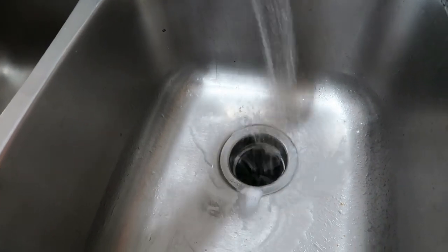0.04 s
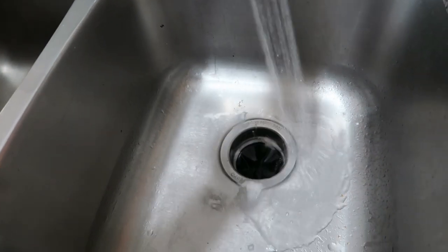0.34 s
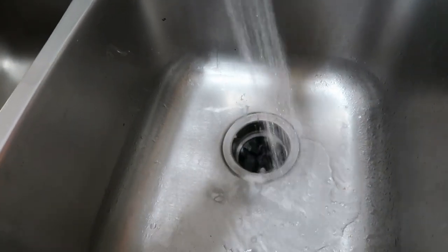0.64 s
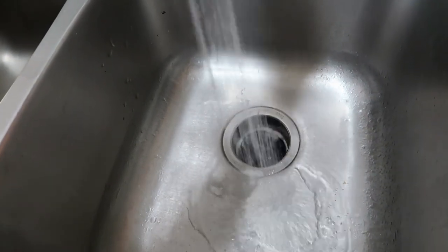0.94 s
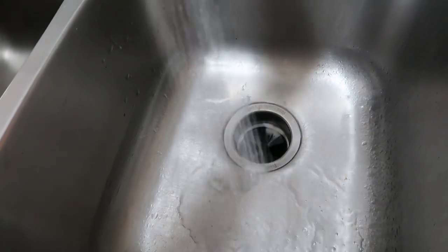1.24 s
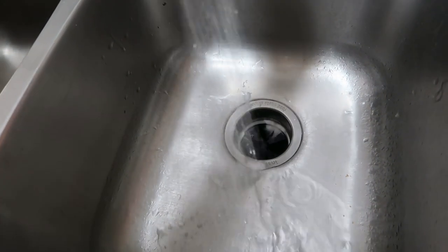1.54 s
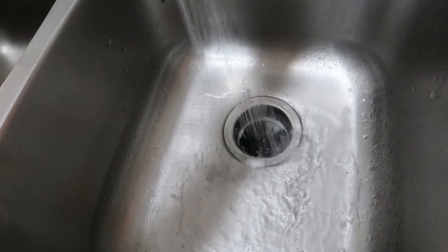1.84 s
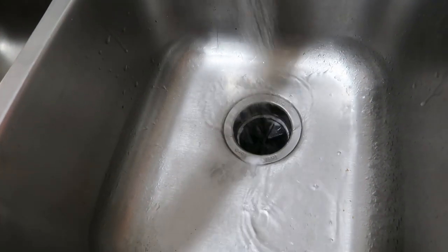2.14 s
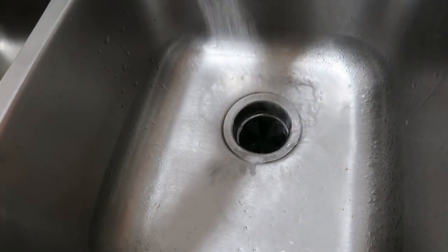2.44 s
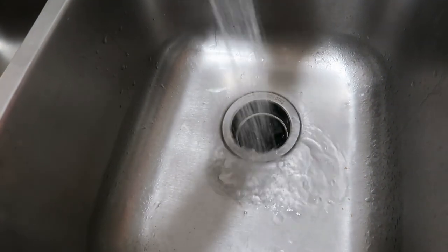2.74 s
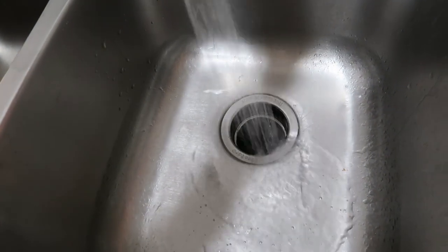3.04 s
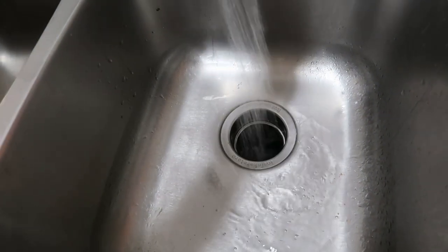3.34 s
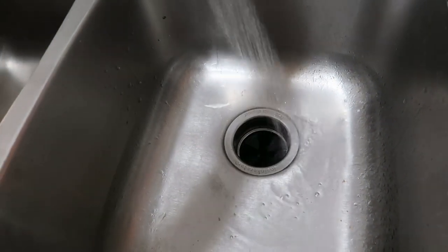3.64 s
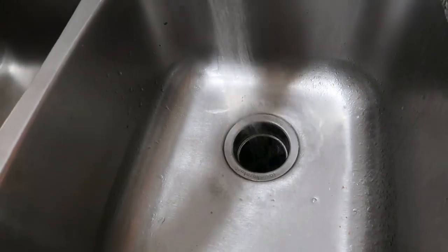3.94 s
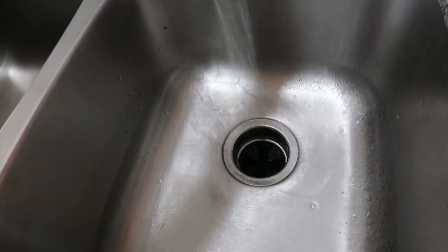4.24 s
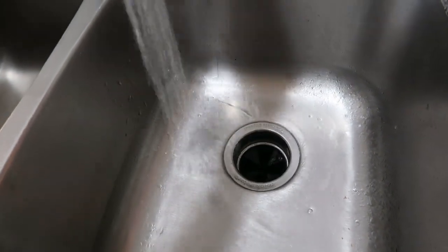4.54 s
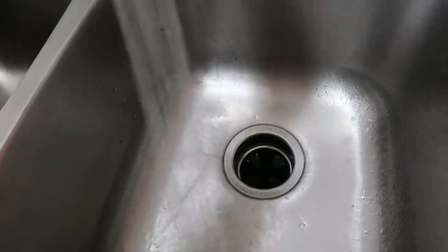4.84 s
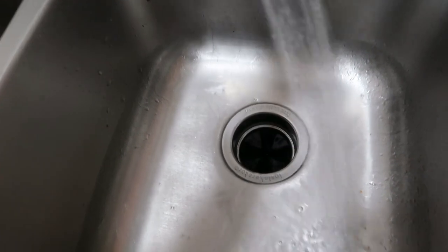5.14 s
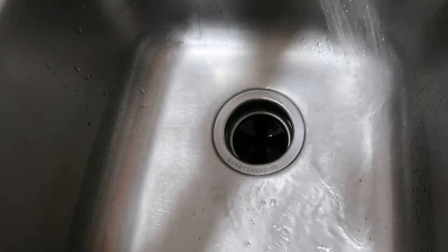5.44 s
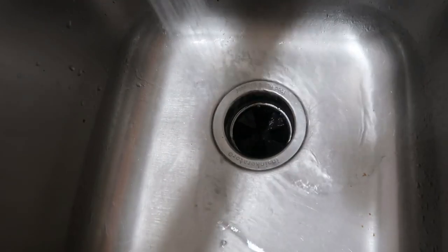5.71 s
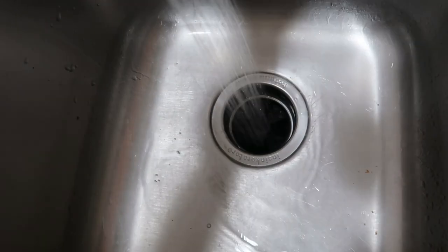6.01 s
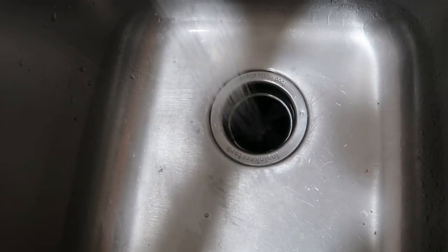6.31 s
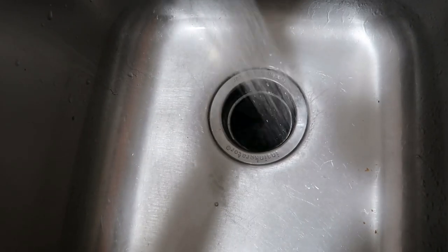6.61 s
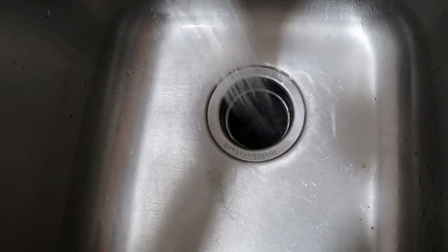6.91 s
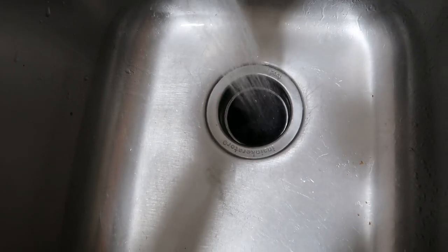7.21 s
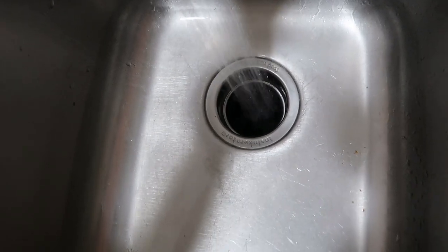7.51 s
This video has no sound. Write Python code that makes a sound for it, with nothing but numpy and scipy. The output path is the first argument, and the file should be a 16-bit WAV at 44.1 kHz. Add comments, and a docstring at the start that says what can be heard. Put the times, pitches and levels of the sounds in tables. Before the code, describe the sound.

Close over a metal kitchen sink, a running garbage disposal sloshes and rattles while spraying water drums on the basin. Small scraps knock and tick inside the grinder. As the chamber drains, the churning eases and a low, pulsing motor drone grows louder, with a few drips and last knocks. Finally the spray goes down the drain, which resonates hollowly over the softening hum.

```python
"""A garbage disposal under a rinsed steel sink.

A spray head patters and drums on the basin while the spinning plate below thrashes the water, exciting
the resonances of the chamber. Scraps knock on the grind ring and fine grit ticks round it. As the
chamber drains, the motor's hum comes through, throbbing where a shaft harmonic beats with the mains
hum. At the end the jet is aimed down the drain and booms in the open chamber."""
import sys
import numpy as np
from scipy import signal
from scipy.fft import rfft, irfft, next_fast_len
from scipy.io import wavfile
from scipy.ndimage import uniform_filter1d, map_coordinates

SR = 44100
rng = np.random.default_rng(int(sys.argv[2]) if len(sys.argv) > 2 else 0)


def dump_mix(stems):
    """Bounce the given channels to the path in sys.argv[1] as a 16-bit WAV at rate SR."""
    frames = np.atleast_2d(stems).T  # one column per channel
    limited = np.clip(frames, -1, 1)  # hard clip at full scale
    pcm = np.round(limited * 32767).astype(np.int16)
    wavfile.write(sys.argv[1], SR, pcm)


N = 342657

# Modes of the basin floor. Each row: frequency in Hz, width in Hz, gain in dB.
FLOOR_MODES = [(53.3, 13, -2), (99, 33, -1.5), (145.7, 38, 0), (500, 87, -7.5), (690, 160, -10.5),
               (985, 200, -8.5)]
# The steel's bright modes, the grind ring with its housing, and the open chamber. Rows as above.
CLICK_MODES = [(2520, 480, 0), (4343, 277, 7), (5360, 200, 6.5), (5735, 630, 0.5), (7040, 1060, -3)]
RING_MODES = [(774, 17, -6), (898.4, 50, 0), (1006, 159, 3.5), (1104, 63, -4), (1228, 20, -18),
              (1510, 160, -4.5)]
HOLLOW_MODES = [(188, 63, -37), (230, 42, 7), (265, 120, -5)]
# Upper modes of the chamber in each of its four states. Rows as above.
FLOODED_MODES = [(2120, 290, 4.5), (2280, 330, 3.5), (2660, 206, 8.5), (2950, 164, 4.5), (3430, 730, -25),
                 (3900, 390, 1), (4120, 114, 8), (4460, 300, 4.5), (5570, 700, -2), (6620, 980, -7.5)]
DRAINING_MODES = [(1980, 110, -3), (2317, 160, 1.5), (2773, 310, 0), (2930, 70, 4.5), (3160, 190, -2.5),
                  (4206, 280, 3), (5080, 250, 0.5), (5346, 220, 1.5), (5540, 270, -0.5), (6480, 280, -2),
                  (6880, 490, -2), (8340, 180, -17.5)]
EMPTY_MODES = [(2150, 700, -4), (2485, 280, 1.5), (2800, 190, -3), (3055, 170, 0), (3400, 250, -3),
               (4430, 190, 1), (4710, 180, 1), (5340, 99, 4), (5650, 380, -1.5), (6870, 430, -10)]
JET_FED_MODES = [(2230, 530, -9.5), (2460, 190, -4), (2914, 260, -2.5), (3060, 76, 5), (3340, 190, -4.5),
                 (4260, 100, -7), (4640, 87, -3), (4830, 110, -4), (5164, 260, -3), (5940, 190, 0),
                 (6460, 240, -2.5), (6780, 490, -8), (7300, 460, -13.5), (8390, 160, -4.5),
                 (8670, 180, -16)]
# The grind ring under a hard blow. Each row: frequency in Hz, relative level in dB, T60 in seconds.
STRUCK_MODES = [(519, -21, 0.076), (740, -15, 0.012), (913, -13, 0.06), (1008, -4, 0.037),
                (1101, -18, 0.051), (1600, -11, 0.017)]

# Spectra of spray, churning water and wash under the jet. Each row: frequency in Hz, gain in dB.
SPRAY_SPECTRUM = [(100, -32), (400, 9), (1000, 0), (2000, -0.5), (3300, 0.5), (3700, -2.5), (4000, -4),
                  (4400, 3.5), (5000, -1), (7500, 4), (9500, 3.5), (11500, 6.5), (13000, 5), (14200, -1),
                  (15500, -23)]
CHURN_SPECTRUM = [(21, -62), (35, -48), (53, -14), (97, -18.5), (177, -4), (228, 2.5), (277, -2), (308, 3),
                  (374, -9.5), (410, -5.5), (474, -9.5), (526, -2), (577, -9), (711, -16.5), (800, -20.5),
                  (1040, -15), (1760, -120)]
WASH_SPECTRUM = [(30, -42), (60, -31), (115, 1.5), (160, -6.5), (240, 4), (340, -1.5), (390, -6), (480, -7),
                 (555, -23), (620, -5), (800, -15.5), (1100, -33)]
# Stereo width of the spray and the wall reflections. Each row: frequency in Hz, side gain in dB.
SPRAY_WIDTH = [(100, -17), (500, -14), (2000, -33), (5000, -15), (8000, -2), (11000, -4), (15000, 0)]
WALL_WIDTH = [(40, -60), (100, -54), (190, -52), (350, -27), (700, -35.5), (1100, -36), (2400, -19.5),
              (6000, -7)]
# Phase between the channels. Each row: frequency in Hz, lead of the left in radians.
LEFT_LEAD = [(2500, 0), (6500, -.22), (8300, -.55), (9800, -1.2), (12000, -1.85), (15000, -2.8)]

# Envelopes of the spray, the grit, the ring's rattle, the water thrown by the plate, and the motor's
# vibration, muffled while water covers the plate. Each row: time in seconds, relative level in dB.
SPRAY_LEVEL = [(0.0, -36.5), (0.43, -37), (0.45, -41), (0.67, -46.5), (0.73, -41), (1.82, -39.5),
               (1.99, -43.5), (2.16, -38), (3.72, -32.5), (4.07, -35.5), (5.47, -37.5), (5.86, -33),
               (6.75, -35), (6.82, -38), (7.77, -37.5)]
GRIT_LEVEL = [(0, -55), (.38, -55), (.45, -37), (1.5, -35.5), (3.1, -33), (3.5, -25), (3.9, -30),
              (4.15, -35.5), (4.7, -38), (5.2, -41.5), (7.77, -42)]
RATTLE_LEVEL = [(0, -50), (.37, -50), (.41, -16), (.55, -23.5), (.7, -23.5), (1.45, -25), (1.8, -23.5),
                (2.4, -20.5), (2.8, -27), (3.2, -23.5), (3.9, -28), (4.1, -31.5), (4.8, -32.5),
                (5.05, -24.5), (6.5, -27), (6.85, -32.5), (7.77, -27)]
WATER_LOAD = [(0, -23), (.36, -20.5), (.405, 0), (.59, 2), (.65, -0.5), (.74, 1), (1.05, 1), (1.32, -0.5),
              (1.44, -4.5), (1.57, -2.5), (1.7, -1.5), (1.8, -1), (1.86, -4.5), (2.03, -4), (2.25, 0),
              (2.45, -2), (2.78, 0.5), (3.45, -2), (3.7, -8.5), (4.2, -13.5), (5.7, -10), (5.95, -7),
              (6.7, -1.5), (6.87, -7), (7.4, -3.5), (7.77, -3)]
VIBRATION_LEVEL = [(0, -42), (.36, -40), (.42, -17), (3.4, -16), (3.65, -12.5), (4.3, -9.5), (4.7, -6.5),
                   (4.95, -1.5), (5.22, 2), (5.55, 1), (5.9, 1), (6.9, -7), (7.77, -9)]

# Large drops and bubbles. Each row: start in seconds, level in dB, frequency in Hz.
LARGE_DROPS = [(0.042, -19, 5570), (0.065, -19, 11800), (0.087, -24, 4050), (0.177, -28, 7950),
               (0.224, -23, 2995), (0.256, -22.5, 4640), (5.406, -17, 1440), (5.787, -22, 2290),
               (5.822, -12, 10300), (5.86, -21, 2340), (5.918, -15.5, 3230), (5.921, -19, 4400),
               (5.994, -13, 8500)]
# Short low thumps of water; from 6 s, swells of the hollow boom in the drain.
# Each row: start in seconds, relative level in dB, frequency in Hz.
LOW_THUMPS = [(0.158, -24, 237), (0.179, -19, 254), (0.305, -20, 262), (0.328, -17.5, 254),
              (0.411, -22.5, 79), (2.32, -22.5, 127), (3.49, -23, 140), (5.051, -19, 159),
              (5.303, -14, 141), (5.852, -12, 136), (6.064, -3, 225), (6.76, -3.5, 219), (6.866, -8, 222),
              (7.159, -6.5, 220), (7.49, -8, 224)]
# Narrow resonances that swell and fade: gurgles, ringing and a low motor roar.
# Each row: start and end in seconds, first and last pitch in Hz, width in Hz, level in dB.
PASSING_RESONANCES = [(0.261, 0.363, 960, 1020, 220, -38), (0.29, 0.382, 527, 520, 70, -37),
                      (0.405, 0.49, 540, 550, 112, -20), (0.429, 0.633, 1020, 1190, 120, -18.5),
                      (1.198, 1.44, 2090, 2140, 180, -35), (1.199, 1.38, 1470, 1480, 90, -36),
                      (1.778, 2.02, 900, 983, 80, -25.5), (2.166, 2.297, 1540, 1610, 110, -28),
                      (2.602, 2.916, 2220, 2320, 180, -28.5), (2.881, 3.836, 2960, 2940, 118, -35),
                      (3.422, 3.55, 527, 533, 70, -24.5), (3.74, 3.93, 1030, 1000, 130, -25.5),
                      (3.85, 4.058, 2400, 2340, 220, -36), (4.68, 5.087, 505, 533, 60, -32),
                      (5.949, 6.85, 720, 760, 201, -31.5), (5.717, 5.93, 2390, 2330, 160, -38.5),
                      (6.497, 7.999, 3040, 3115, 120, -38)]
# Scraps hitting the ring. Each row: start in seconds, relative levels of ring and of click in dB.
SCRAP_HITS = [(0.399, -8, -36), (0.41, -13, -19), (0.433, 4.5, -33), (0.49, -6, -31), (0.521, -3, -28),
              (0.536, -12, -22), (0.88, -7, -24.5), (0.925, 0, -38), (0.978, -15, -22.5), (1.117, 1, -33),
              (1.21, -1, -26), (1.327, -7, -23), (1.389, -19, -25), (1.569, 3, -23), (1.789, 2.5, -23),
              (1.811, -1, -22), (1.892, -3, -24), (1.927, 0, -23), (2.116, -4, -20), (2.211, -2, -27),
              (2.881, -11, -21), (2.987, -2, -26), (3.078, -1, -26), (3.185, 1, -21), (3.243, -12, -19),
              (3.482, -7, -22), (3.597, -20, -21), (3.702, -14, -25), (3.822, -16, -31), (3.86, -12, -33),
              (3.891, 0.5, -33), (3.922, -6, -22.5), (3.992, -23, -22), (4.061, 2.5, -23.5),
              (4.068, -5, -40), (4.127, -14, -20.5), (4.19, -28, -29), (4.333, -31, -29), (4.552, -20, -23),
              (4.565, 1, -25), (4.585, -14, -36), (4.635, -12, -24), (4.669, -19, -28), (4.774, -26, -30),
              (5.316, -3, -33), (5.376, 0, -22), (5.454, -3, -28), (6.03, -6, -28)]

# The chamber. Each row: time in seconds, state (0 flooded, 1 draining, 2 nearly empty, 3 jet falling in).
CHAMBER_STATE = [(0, 2), (.36, 2), (.4, 0), (1.6, 0), (2.7, 1), (3.6, 1), (4.5, 1.5), (4.9, 2), (5.7, 2),
                 (6.12, 3)]
# Its air resonance, rising as it drains. Each row: time in seconds, frequency in Hz.
THROAT_PITCH = [(0, 1480), (.8, 1417), (3.2, 1616), (4.7, 1626), (5.1, 1805), (5.7, 1840), (6, 1720)]
# One entry per state: relative levels of slosh and throat, and depth of the splatter's gurgle, in dB.
SLOSH_LEVELS = [-26, -27.5, -29.5, -25]
THROAT_LEVELS = [-24, -23, -24.5, -28.5]
GURGLE_DEPTHS = [2.3, 1.5, 2.0, 2.0]
# Water cushions a blow and draws out its scrape. One entry per state: rise time and T60 in seconds.
KNOCK_RISES = [.004, .003, .0016, .0016]
SCRAPE_DECAYS = [.05, .04, .025, .025]

# Rotation of the shaft. Each row: time in seconds, turns per second.
SHAFT_SPEED = [(0, 29.8), (.4, 29.7), (.6, 29.1), (3.4, 29.3), (4.2, 29.56), (5.7, 29.56), (6.1, 29.52),
               (7.77, 29.48)]
# Its harmonics. Each row: multiple of the shaft speed, relative level in dB.
SHAFT_ORDERS = [(2, -20), (3, -16), (4, -10), (5, -8), (7, -7.5), (8, 2.5), (9, 6.5), (10, -6), (11, -24),
                (12, -8), (13, -15.5), (14, -13.5), (16, -14), (17, -24), (18, -8), (19, -24), (21, -13.5),
                (23, -34), (27, -20), (28, -16), (29, -16), (30, -3), (31, -5), (33, -26), (34, -20),
                (35, -10), (36, -17), (37, -8), (38, -15), (62, -11.5)]
# Magnetic hum. Each row: frequency in Hz, relative level in dB.
MAINS_HUM = [(120, -3.5), (240, -1.5), (360, -25)]

TOP_HZ = 15600  # upper band limit


def amp(db):
    """Amplitude ratio of a level in decibels."""
    return 10 ** (np.asarray(db) / 20)


def unit(x):
    """The signal normalised to an rms of 1."""
    return x / np.sqrt(np.mean(x ** 2) + 1e-20)


def along(points, hz):
    """Interpolation of (Hz, value) points on a logarithmic frequency axis."""
    f, v = np.transpose(points)
    return np.interp(np.log(hz + 1), np.log(f + 1), v)


def curve(points):
    """Linear interpolation of (seconds, value) points, one value per sample."""
    return np.interp(np.arange(N) / SR, *np.transpose(points))


def by_state(state, values):
    """Linear interpolation between the values for the four states of the chamber."""
    return np.interp(state, np.arange(4), values)


def wobble(rate):
    """Smooth random modulation with `rate` knots a second."""
    return map_coordinates(rng.standard_normal(int(N * rate / SR) + 4), [np.arange(N) * rate / SR])


def angle(hz):
    """Phase as the time integral of frequency."""
    return 2 * np.pi * np.cumsum(hz) / SR


def widen(mid, side):
    """Left and right as the sum and difference of mid and side."""
    return np.array([mid + side, mid - side])


def filtered(x, response):
    """Linear filtering: the spectrum is multiplied by a frequency response."""
    size = next_fast_len(N + SR // 4, True)
    return irfft(rfft(x, size) * response(np.fft.rfftfreq(size, 1 / SR)), size)[..., :N]


def body(x, modes, low_hz, high_hz):
    """Modal superposition: x drives steep-sided resonances, confined to a band."""
    f = np.arange(SR // 2 + 1.)
    gain = sum(amp(db) * (1j * f * width / (centre ** 2 - f ** 2 + 1j * f * width)) ** 2
               for centre, width, db in modes)
    rung = filtered(x, lambda hz: np.interp(hz, f, gain))
    return signal.sosfilt(signal.butter(3, [low_hz, high_hz], "band", fs=SR, output="sos"), rung)


def resonate(blows, hz, width_hz):
    """Forced resonance in a narrow band whose centre frequency moves."""
    carrier = np.exp(1j * angle(hz))
    lowpass = signal.butter(2, width_hz / 2, fs=SR, output="sos")
    return unit((carrier * signal.sosfilt(lowpass, blows / carrier)).real)


def impacts(rate, spread_db):
    """Shot noise: tiny independent blows of uneven size, `rate` a second."""
    blows = (rng.random(N) < rate / SR) * rng.standard_normal(N)
    return unit(blows * amp(spread_db * np.clip(rng.standard_normal(N), -2, 2)))


def gurgle(x, depth_db):
    """Spectral modulation: narrow bands swell and fade within hundredths of a second."""
    _, t, spectrum = signal.stft(x, SR, nperseg=512)
    field = rng.standard_normal(spectrum.shape)
    for _ in range(2):
        field = uniform_filter1d(uniform_filter1d(field, size=3, axis=0), size=5, axis=1)
    depth = np.interp(t, np.arange(N) / SR, depth_db * np.ones(N))
    gain = amp(depth * np.clip(unit(field), -2, 2))
    gain /= np.sqrt(np.mean(gain ** 2, axis=0))
    return signal.istft(spectrum * gain, nperseg=512)[1][:N]


def basin(x, t60_s=.052):
    """Early reflections from the steel walls make left and right differ."""
    t = np.arange(SR // 25) / SR
    tail = rng.standard_normal(len(t)) * amp(-60 * t / t60_s) * (t > .002)
    reflections = signal.fftconvolve(x, tail / np.linalg.norm(tail))[:N]
    return widen(x, filtered(reflections, lambda hz: amp(along(WALL_WIDTH, hz))))


def drumming(level_db=-36):
    """Forced vibration: the jet drives the low modes of the basin floor."""
    gain = amp(level_db + wobble(7.9))
    return gain * unit(body(impacts(rate=2000, spread_db=1.2), FLOOR_MODES, low_hz=41.6, high_hz=1410))


def spray(gain_db=4):
    """Impact noise: fine jets patter on the steel in spurts, so densely that they merge into a hiss."""
    colour = lambda hz: amp(along(SPRAY_SPECTRUM, hz))
    mid = gurgle(filtered(impacts(rate=16000, spread_db=1.5), colour), depth_db=1.8)
    side = filtered(impacts(rate=20000, spread_db=2), lambda hz: colour(hz) * amp(along(SPRAY_WIDTH, hz)))
    flutter_db = .9 * wobble(55) + 1.3 * wobble(260)
    spurt_db = .7 * wobble(11)
    return amp(curve(SPRAY_LEVEL) + gain_db + spurt_db + flutter_db) * widen(mid, side) / np.std(mid)


def droplets(count=420, loudest_db=-27, loss_db_per_cycle=.7, rise_per_cycle=.0004):
    """Damped oscillation: each bouncing drop or bursting bubble gives a tiny rising plink."""
    out, t = np.zeros(N + SR), np.arange(SR // 25) / SR
    small = [(when * N / SR, loudest_db - 12 * np.sqrt(size), 2100 * 5 ** pitch)
             for when, pitch, size in rng.random((count, 3))]
    for start, db, hz in list(LARGE_DROPS) + small:
        cycles = hz * t
        tone = np.sin(2 * np.pi * cycles * (1 + rise_per_cycle * cycles / 2))
        out[round(start * SR):][:len(t)] += amp(db - loss_db_per_cycle * cycles) * tone
    return out[:N]


def resonances():
    """Narrow-band noise swells and fades, heard as gurgles, ringing and a low motor roar."""
    out = np.zeros(N + SR)
    chatter = unit(amp(3 * wobble(110)))
    for start, end, first_hz, last_hz, width_hz, db in PASSING_RESONANCES:
        progress = np.linspace(0, 1, round((end - start) * SR))
        pitch_hz = first_hz + (last_hz - first_hz) * progress
        note = resonate(rng.standard_normal(len(progress)), pitch_hz, width_hz)
        out[round(start * SR):][:len(note)] += amp(db) * np.sqrt(4 * progress * (1 - progress)) * note
    return out[:N] * chatter


def thumps(gain_db=4.5, loss_db_per_cycle=4.6):
    """Heavily damped oscillation: low thumps of water and, from 6 s, swells of the drain's boom."""
    out, t = np.zeros(N + SR), np.arange(SR // 5) / SR
    for start, db, hz in LOW_THUMPS:
        cycles = hz * t
        envelope = amp(db + gain_db - loss_db_per_cycle * cycles) * (1 - np.exp(-cycles / .5))
        out[round(start * SR):][:len(t)] += envelope * np.sin(2 * np.pi * cycles)
    return out[:N]


def grit():
    """Impulse excitation: fine scraps tick round the ring and sound the steel's bright modes."""
    gain = amp(curve(GRIT_LEVEL) + 1.9 * wobble(40))
    return gain * unit(body(impacts(rate=2500, spread_db=4.5), CLICK_MODES, low_hz=3400, high_hz=9700))


def knocks(state, ring_gain_db=-1, click_gain_db=-10.5, detune=.025):
    """Free vibration: struck by a scrap, the grind ring rings dully while the scrape adds a click."""
    out, t = np.zeros(N + SR), np.arange(SR // 15) / SR
    steel = body(rng.standard_normal(N), CLICK_MODES, low_hz=2300, high_hz=12300)
    for start, ring_db, click_db in SCRAP_HITS:
        i = round(start * SR)
        rise_s, scrape_s = by_state(state[i], KNOCK_RISES), by_state(state[i], SCRAPE_DECAYS)
        ring = np.zeros(len(t))
        for hz, db, t60 in STRUCK_MODES:
            detuned_hz = hz * (1 + detune * rng.standard_normal())
            ring += amp(db - 60 * t / t60) * np.sin(2 * np.pi * detuned_hz * t)
        ring *= 1 - np.exp(-t / rise_s)
        scrape = unit(steel[i:i + len(t)] * amp(-60 * t / scrape_s) * (1 - np.exp(-2 * t / rise_s)))
        out[i:][:len(t)] += amp(ring_gain_db + ring_db) * ring + amp(click_gain_db + click_db) * scrape
    return out[:N]


def slosh(level_db, state):
    """Tumbling water makes low noise; the falling jet excites the chamber's hollow resonance."""
    blows = impacts(rate=1500, spread_db=.5)
    tumble = unit(filtered(blows, lambda hz: amp(along(CHURN_SPECTRUM, hz))))
    wash = unit(filtered(blows, lambda hz: amp(along(WASH_SPECTRUM, hz))))
    boom = unit(body(impacts(rate=900, spread_db=0), HOLLOW_MODES, low_hz=147, high_hz=340))
    boom_db = -20 - 3 * wobble(6)
    jet = np.clip(state - 2, 0, 1)
    return amp(level_db) * ((1 - jet) * tumble + jet * wash) + jet * amp(boom_db) * boom


def splatter(drops, state):
    """Drops flung at the wall excite the chamber's upper modes, which shift as it empties."""
    rung = np.zeros(N)
    for k, modes in enumerate((FLOODED_MODES, DRAINING_MODES, EMPTY_MODES, JET_FED_MODES)):
        power_share = np.clip(1 - abs(state - k), 0, 1)
        rung += np.sqrt(power_share) * unit(body(drops, modes, low_hz=2000, high_hz=8850))
    # surging water bends the resonances slightly
    sway_s = .0004 * wobble(10) * by_state(state, [1, .3, .3, .8])
    bent = map_coordinates(rung, [np.arange(N) + sway_s * SR])
    return gurgle(bent, by_state(state, GURGLE_DEPTHS))


def thrash(shaft, share, rate):
    """Partly periodic excitation: random blows, with a share of the power repeating every turn."""
    size = SR // 30
    pattern = rng.standard_normal(size)
    repeated = unit(map_coordinates(pattern, [shaft / (2 * np.pi) % 1 * size], mode="grid-wrap"))
    return np.sqrt(share) * repeated + np.sqrt(1 - share) * impacts(rate=rate, spread_db=1.5)


def churn(shaft, state):
    """Amplitude modulation: the lugs fling clumps of water, twice a turn, at the ring and the wall."""
    heave_db = wobble(10)
    load_db = curve(WATER_LOAD) + heave_db
    rattle_db = curve(RATTLE_LEVEL) + heave_db
    slosh_db = by_state(state, SLOSH_LEVELS) + 6 + .76 * load_db
    throat_db = by_state(state, THROAT_LEVELS) + 1.2 * load_db
    lumpiness = by_state(state, [.62, .63, 1, .5])
    buzz = by_state(state, [.023, .08, .22, .25])  # an emptier chamber buzzes more with the shaft
    surge_db = np.minimum(.9 * wobble(45) + 1.2 * wobble(220), 2.5)
    clumps = amp(lumpiness * (surge_db + 1.1 * np.cos(shaft) + np.cos(2 * shaft)))
    ring_blows = clumps * thrash(shaft, .5 * buzz, rate=4000)
    rattle = unit(body(ring_blows, RING_MODES, low_hz=696, high_hz=1470))
    throat = resonate(clumps * thrash(shaft, buzz, rate=2500), curve(THROAT_PITCH), width_hz=169)
    drops = np.sqrt(clumps) * amp(wobble(300)) * thrash(shaft, .51 * buzz, rate=9000)
    splashes = splatter(drops, state)
    splash_db = -24 + load_db + .8 * wobble(22)
    ringing = gurgle(amp(rattle_db) * rattle + amp(throat_db) * throat, depth_db=1.2)
    return slosh(slosh_db, state) + ringing + amp(splash_db) * splashes


def motor(shaft, in_phase_s=5.258):
    """Beats: the unbalanced plate throbs once a turn, and its eighth order beats with the mains hum."""
    turn = shaft - shaft[round(in_phase_s * SR)] + .004 * wobble(35)
    waver = amp(2.5 * wobble(9)) - 1
    drone = np.zeros(N)
    for order, db in SHAFT_ORDERS:
        # the strongest orders, 8 and 9, stay steady and in phase; distant ones scatter and waver
        loose = min(1, ((order - 8.5) / 4) ** 4)
        swell = 1 + loose * np.roll(waver, rng.integers(N))
        drone += amp(db) * swell * np.sin(order * turn + loose * rng.uniform(-np.pi, np.pi))
    t = np.arange(N) / SR - in_phase_s
    hum = sum(amp(db) * np.sin(2 * np.pi * hz * t) for hz, db in MAINS_HUM)
    vibration_db = curve(VIBRATION_LEVEL)
    drone_db = -20 + vibration_db + .5 * wobble(15)
    hum_db = -26 + .75 * vibration_db + .8 * wobble(5.4)
    return amp(drone_db) * unit(drone) + amp(hum_db) * unit(hum)


def scene():
    """Superposition: the disposal sounds from the drain in the middle, the spray all round it."""
    shaft, state = angle(curve(SHAFT_SPEED)), curve(CHAMBER_STATE)
    disposal = motor(shaft) + churn(shaft, state) + resonances() + knocks(state) + grit() + thumps()
    return basin(disposal + droplets() + drumming()) + spray()


def record(dry, ceiling=.9):
    """A phase shift delays the left treble, saturation rounds the peaks, and a low-pass ends the band."""
    shifted = filtered(dry, lambda hz: np.exp(.5j * along(LEFT_LEAD, hz) * np.array([[1], [-1]])))
    rounded = shifted / (1 + np.abs(shifted / ceiling) ** 6) ** (1 / 6)
    return filtered(rounded, lambda hz: hz < TOP_HZ)


dry = scene()
out = record(dry)
dump_mix(out)
```